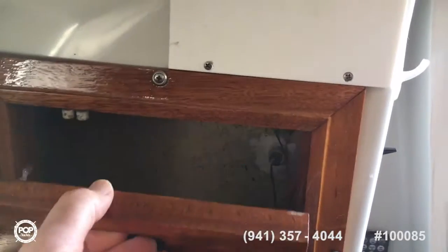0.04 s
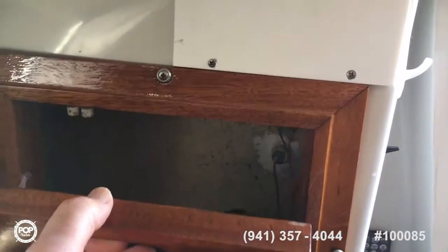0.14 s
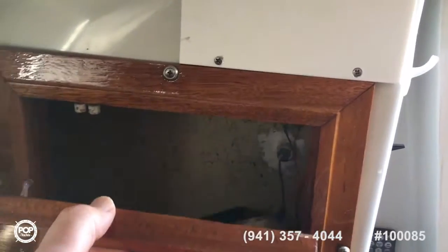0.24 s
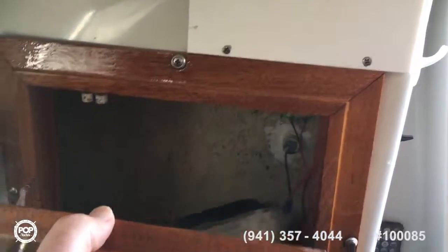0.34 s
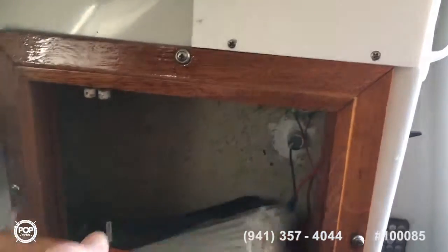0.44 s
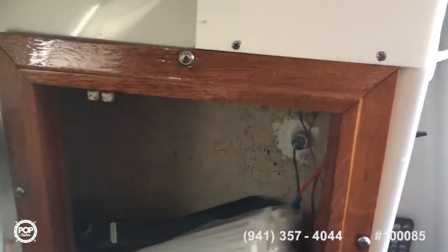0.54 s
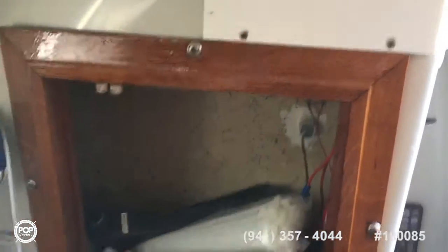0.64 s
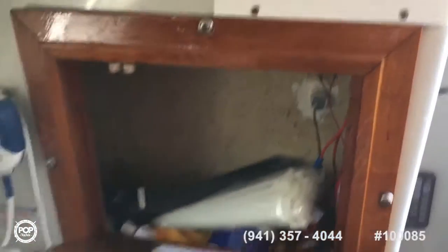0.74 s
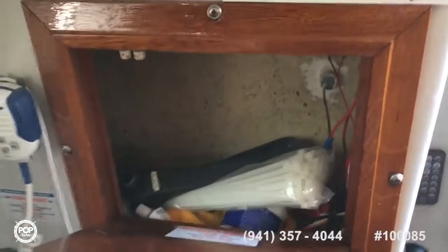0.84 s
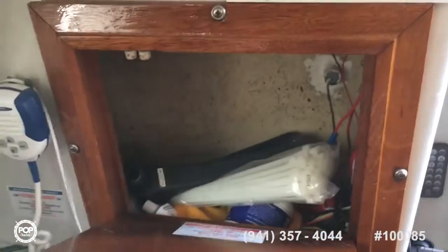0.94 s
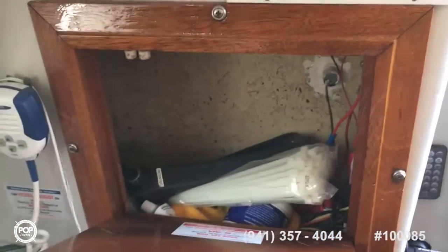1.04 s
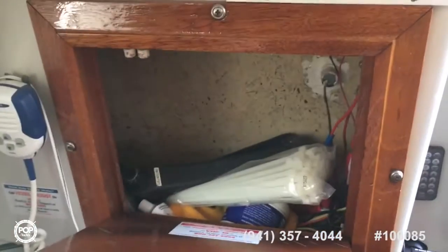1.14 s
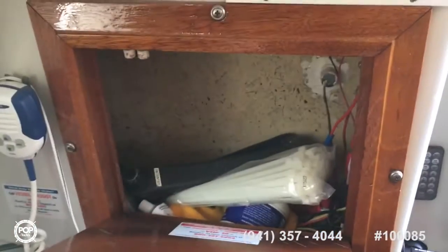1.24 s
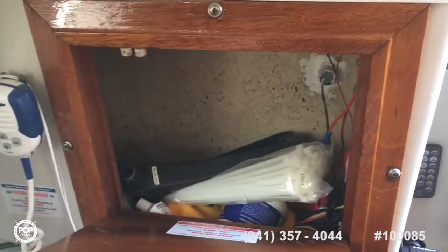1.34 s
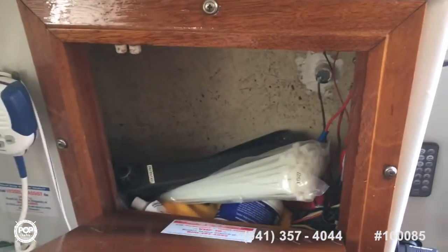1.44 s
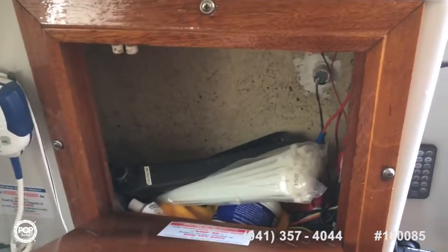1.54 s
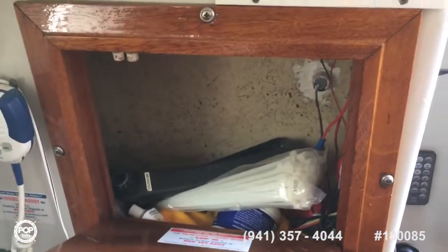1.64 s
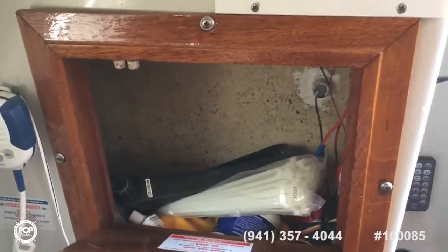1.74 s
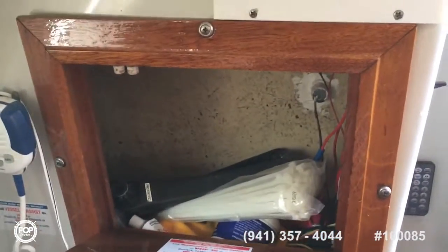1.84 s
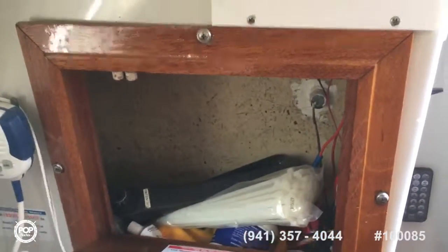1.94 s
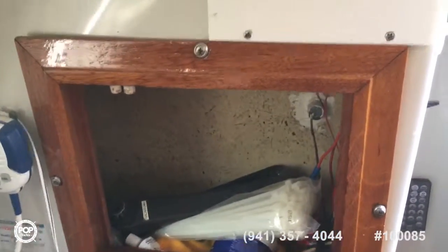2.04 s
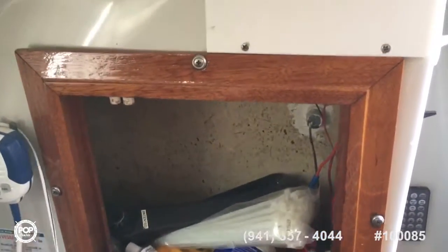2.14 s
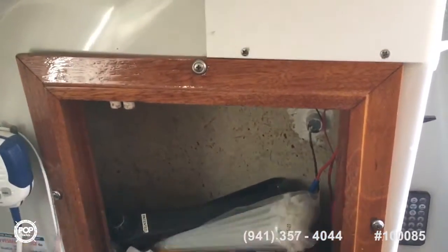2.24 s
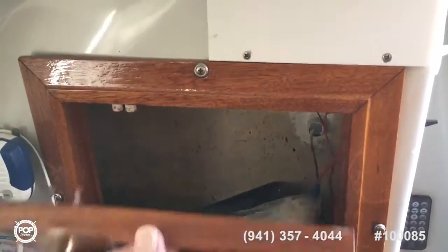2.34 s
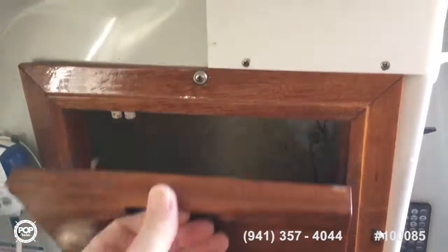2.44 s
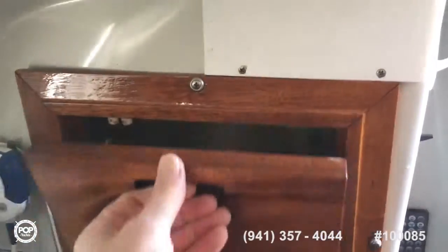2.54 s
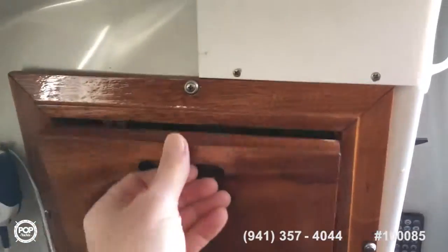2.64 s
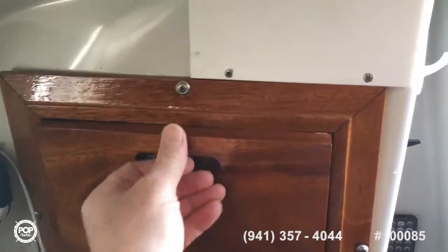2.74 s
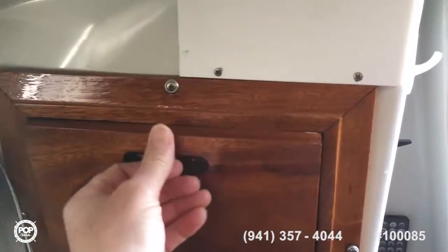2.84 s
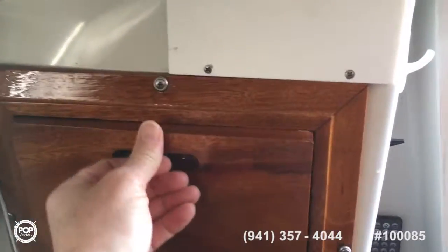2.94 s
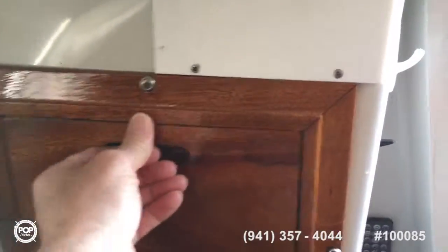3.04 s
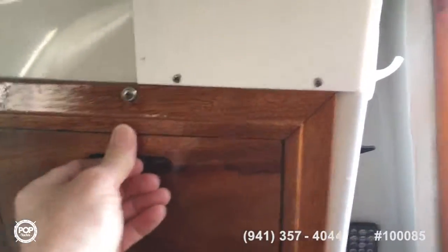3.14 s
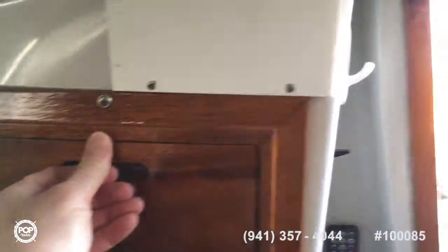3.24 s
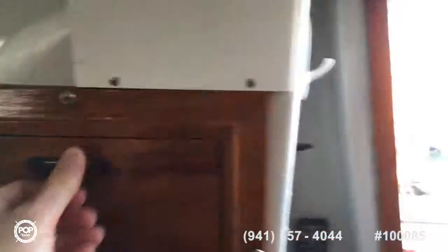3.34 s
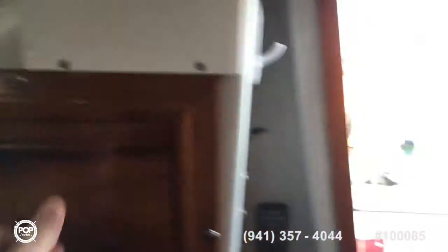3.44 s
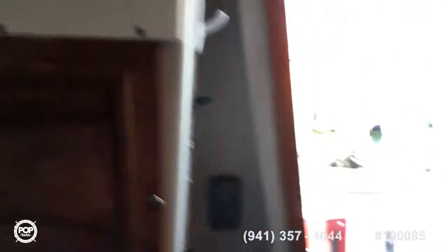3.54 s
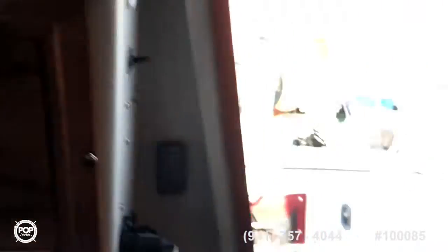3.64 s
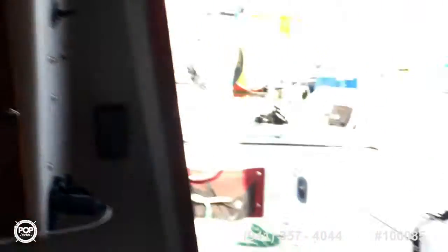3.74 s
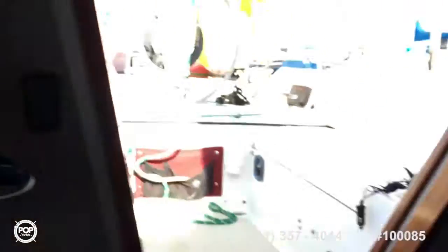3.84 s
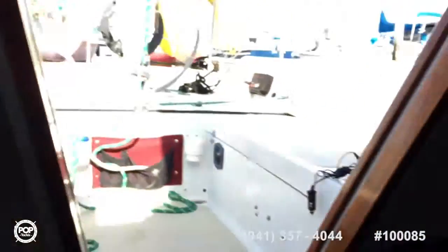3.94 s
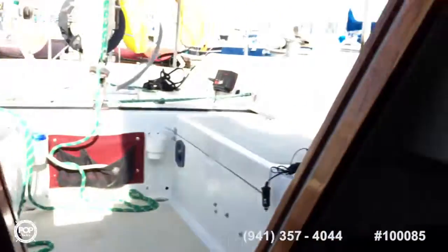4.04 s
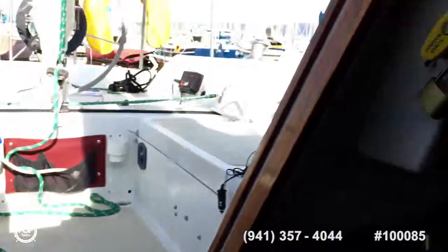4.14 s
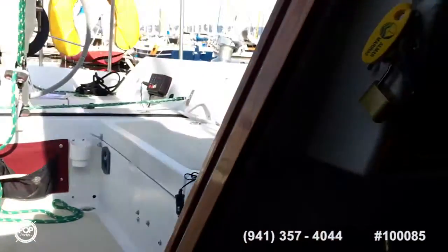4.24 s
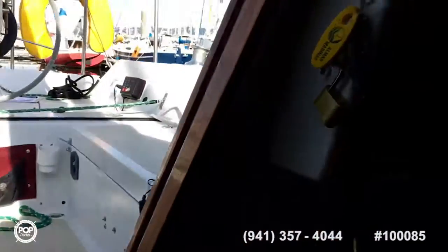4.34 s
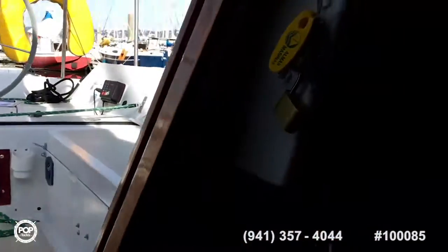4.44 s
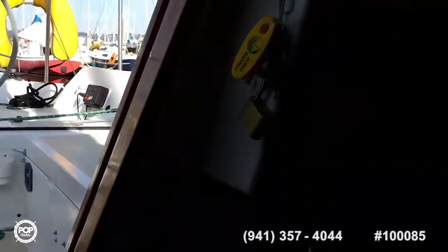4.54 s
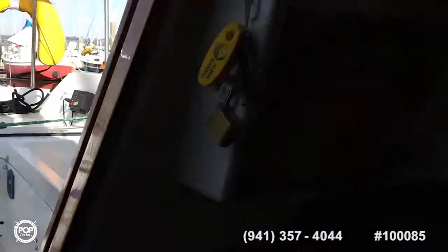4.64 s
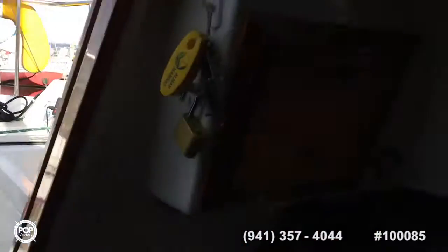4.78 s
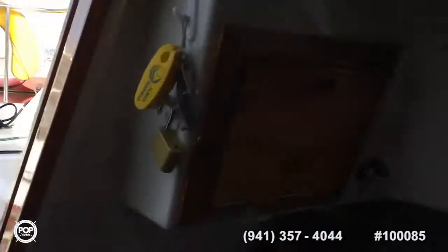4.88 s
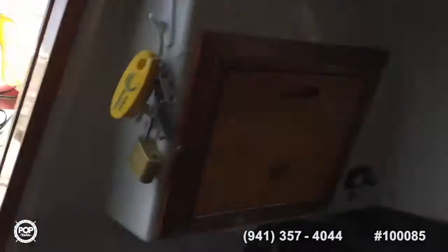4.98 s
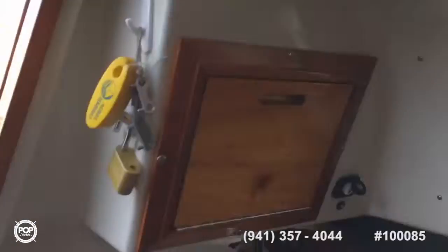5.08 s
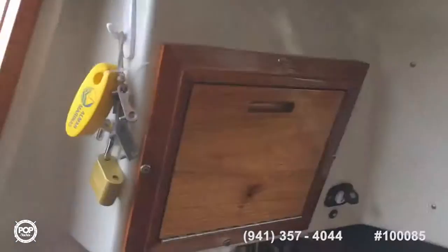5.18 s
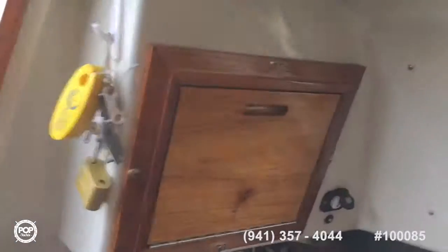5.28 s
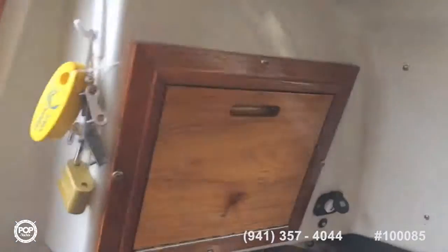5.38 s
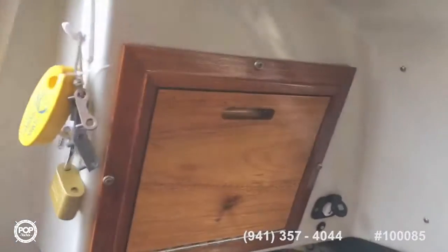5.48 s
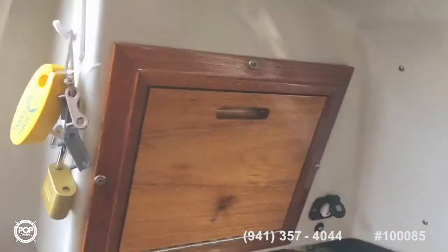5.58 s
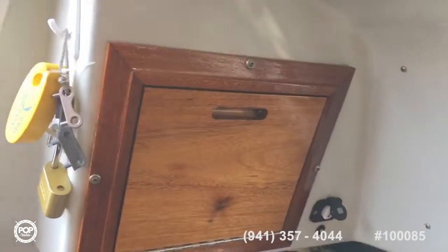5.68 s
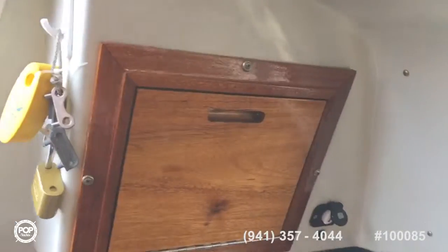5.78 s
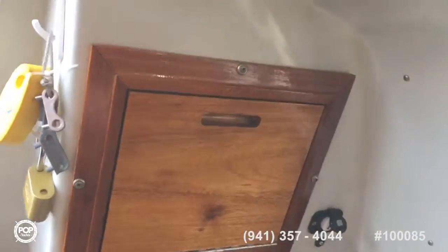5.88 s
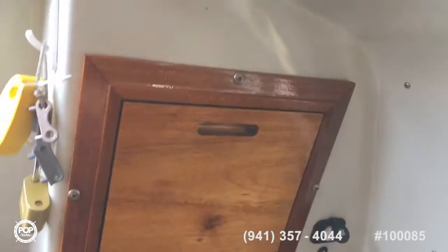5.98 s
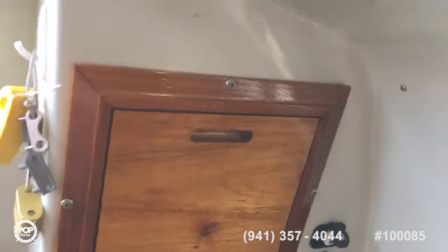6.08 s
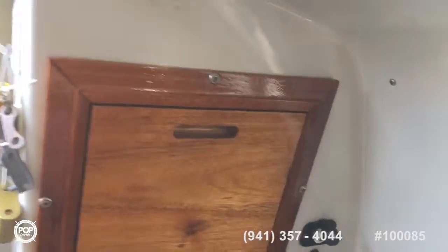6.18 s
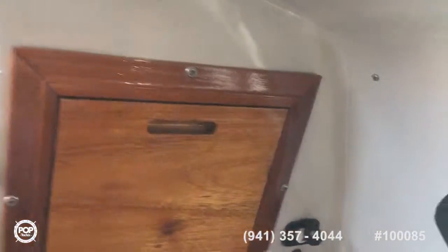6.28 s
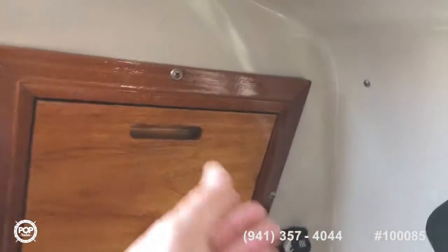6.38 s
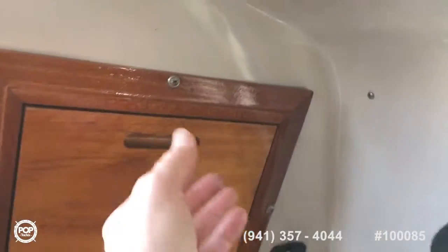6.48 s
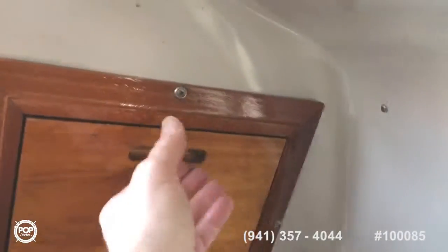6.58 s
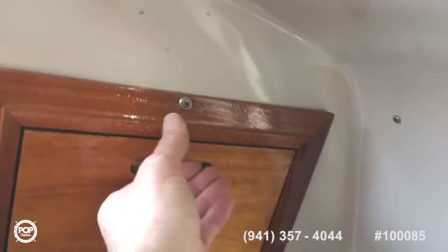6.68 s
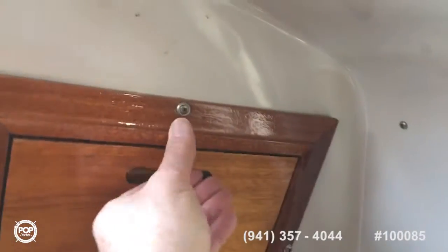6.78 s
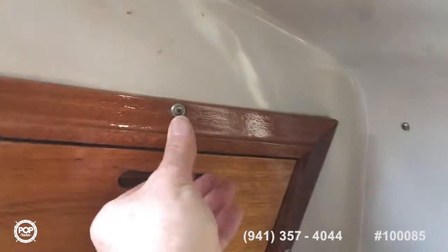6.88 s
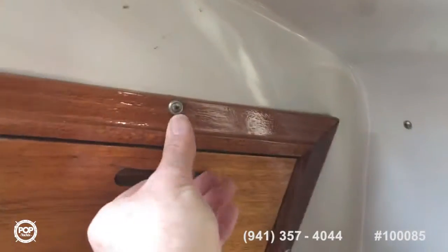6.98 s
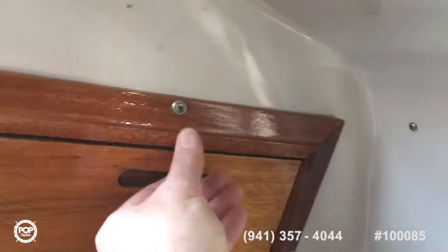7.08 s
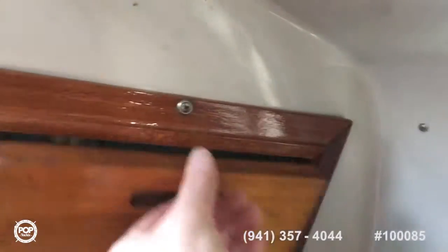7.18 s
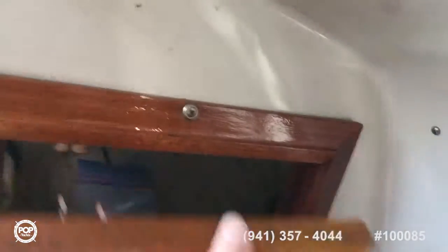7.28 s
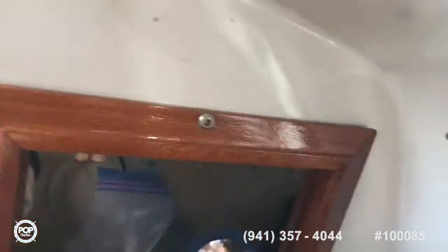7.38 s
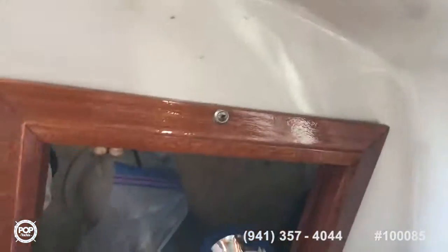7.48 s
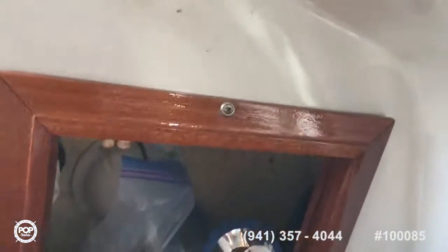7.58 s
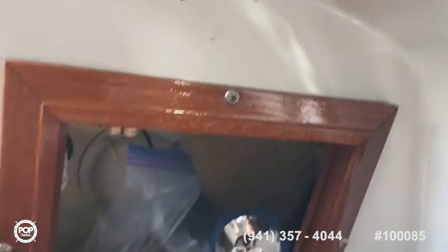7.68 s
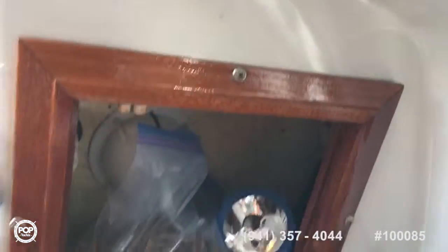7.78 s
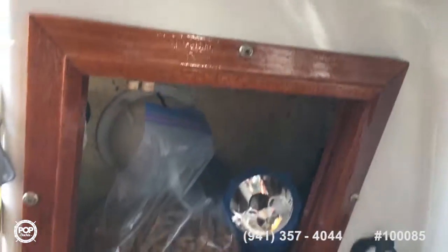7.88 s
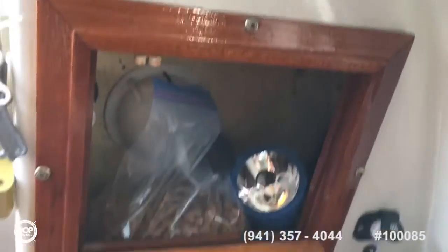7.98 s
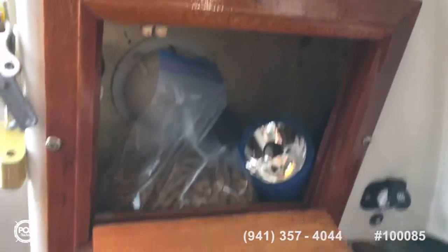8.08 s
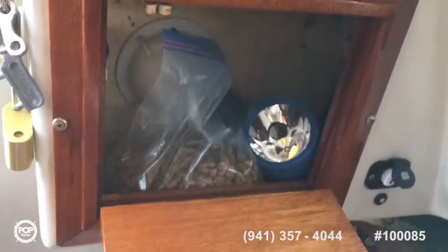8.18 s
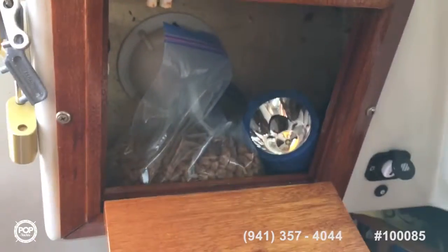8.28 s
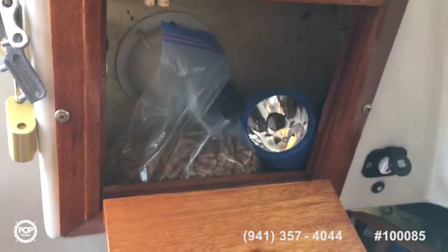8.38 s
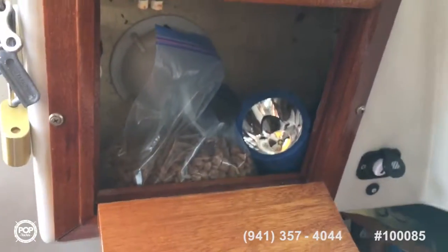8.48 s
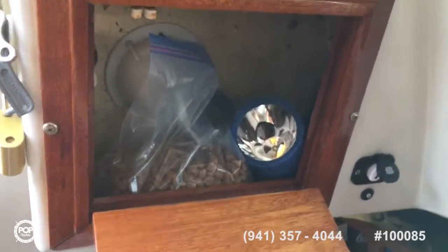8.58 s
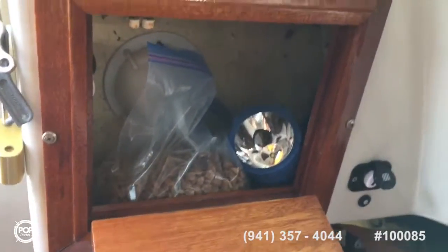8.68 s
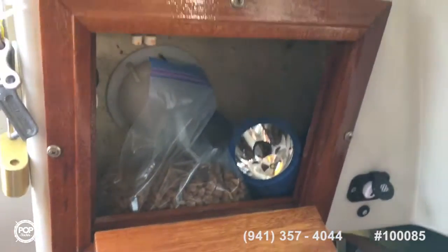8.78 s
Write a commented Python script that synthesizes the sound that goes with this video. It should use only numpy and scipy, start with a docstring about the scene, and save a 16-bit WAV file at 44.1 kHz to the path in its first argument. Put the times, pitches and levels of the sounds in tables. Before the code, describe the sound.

A small boat cabin, heard close, with short woody echoes, a continuous low hull rumble and faint outside air. From 0 to 1.1 seconds a wooden locker door is lowered: soft low hinge creaks, coarse edge grating and light irregular taps. A small clear tick falls at 1.6, with fainter touches at 2.1 and 2.4. At 2.8 the door knocks loudly on its frame, a sharp crack with a low boom; from 3.0 to 3.2 a tight burst of thumps, scrapes and a bright snap shuts it. Clothes rustle as someone turns, mostly quiet until boomy footfalls and shoe scuffs at 5.1 and 5.9, with fabric swishes and a low thud near 6.4. Light fumbling at 6.7 leads to a second panel rattling open from 7.1 to 7.35 with a deep hollow thump. Then only rumble, faint rustle, a tiny tick near 8 and a soft palm rub around 8.5 to 8.8.

```python
"""Two locker doors in a boat cabin

In a small boat cabin a wooden locker door is lowered, swung up again, knocks on its frame and snaps shut.
Someone turns, clothes rustling, steps across the hollow sole and pulls a second locker open with a rattle.
Knocks are filtered bursts with ringing modes and cabin echoes; big panels boom as wavering low tones.
Hinge, edge and palm are streams of tiny slips that ring the wood; cloth, hull and air are coloured noise.
A gain control turns the sound down after the louder blows and slowly lets it back up."""
import sys
import numpy as np
from scipy import signal
from scipy.fft import rfft, irfft, next_fast_len
from scipy.io import wavfile
from scipy.ndimage import uniform_filter1d

SR = 44100
rng = np.random.default_rng(int(sys.argv[2]) if len(sys.argv) > 2 else 0)


def pcm_store(signal):
    """Save signal as 16-bit PCM."""
    levels = np.round(np.clip(np.atleast_2d(signal), -1, 1) * 32767)
    wavfile.write(sys.argv[1], SR, levels.astype(np.int16).T)


N = 388962
TIME = np.arange(N) / SR

# Each single blow is built in a window of this many samples
BLOW_SIZE = 2 ** 15
BLOW_TIME = np.arange(BLOW_SIZE) / SR
BLOW_HZ = np.maximum(np.arange(BLOW_SIZE // 2 + 1) * SR / BLOW_SIZE, 1)


# Touches and knocks of the first door; the levels are relative. Columns:
# start_s, level_db, weight_db (extra bass from the weight behind it),
# knee_hz (higher for a harder contact), slope_db (per octave above the knee), scrape_s,
# tock_hz (favoured resonance), tock_db (its lift), modes_db (the panel's free ringing)
FIRST_DOOR_CONTACTS = [(0.026, -47, 11.5, 3000, -4.5, 0.00098, 296, 8, 2),
                       (0.126, -49.5, -24, 4000, -4, 0.0014, 1130, 6.9, -6),
                       (0.452, -58, 14, 1800, -3.5, 0.007, 384, 9.2, -3),
                       (0.487, -51, 6, 2200, -5, 0.00098, 1440, 8, -1),
                       (0.512, -58.5, 7, 1700, -4, 0.0054, 1080, 12, 5),
                       (0.544, -57, 8, 1700, -10, 0.0011, 156, 29, -12),
                       (0.589, -54.5, 7, 2700, -6.5, 0.0011, 380, 7, -2),
                       (0.62, -59, 12.5, 1130, -22, 0.0049, 355, 9.1, 5.5),
                       (0.68, -54.5, 1, 1800, -18, .0005, 314, 6.4, -1),
                       (0.716, -63.5, 13, 1800, -2, 0.0016, 1310, 6, 3),
                       (0.729, -47, -3, 1390, -15, 0.00036, 1250, 3.7, -4),
                       (0.918, -54.5, 6, 4030, -11, 0.0019, 1400, 13.6, 1),
                       (1.022, -62.5, 14, 1180, -12, 0.0037, 344, 20, 3.5),
                       (1.06, -65, 18, 890, -4, 0.0023, 357, 12, 0),
                       (1.6165, -41.5, 3, 1600, -10, 0.0004, 324, 10.3, 0),
                       (2.135, -56, 12.5, 1200, -8, 0.0021, 346, 15.5, -4.5),
                       (2.357, -58.5, 7, 2200, -8, 0.0004, 1810, 4, -6),
                       (2.8035, -24, 6, 970, -8, 0.00059, 1260, 2.3, -9.5),
                       (2.82, -57.5, 30, 2500, 4.5, 0.0032, 9000, 5.3, -3),
                       (2.832, -38.5, 15.5, 790, -27, 0.015, 362, 4.2, -3),
                       (3.026, -50.5, 26.5, 2200, -5.5, 0.0092, 187, 11, -5.5),
                       (3.043, -50.5, 26, 1500, -5, 0.022, 1300, 4.5, -3),
                       (3.0625, -38, 9, 2840, -7, 0.0047, 980, 10, -4),
                       (3.076, -40.5, 11.5, 900, -4.5, 0.0016, 306, 4.3, -2),
                       (3.088, -47, 23.5, 1200, -7, 0.031, 232, 4, -9),
                       (3.1232, -30.5, 4.5, 3540, -4, 0.0022, 2200, 8.5, -3.5),
                       (3.131, -42, 7, 900, -6.5, 0.05, 720, 4.5, 1.5),
                       (3.164, -45.5, 12, 1300, -3.5, 0.025, 312, 3.4, -7),
                       (3.372, -56, 8, 6000, 1, 0.0017, 5650, 14, -1.5)]
# What the first door rings with, before a small change at each blow: pitch_hz, level_db, t60_s
FIRST_DOOR_MODES = [(190.3, 2, 0.66), (266.6, 0, 0.19), (314.8, 7.5, 0.135), (383.6, 9, 0.15),
                    (517, -8, 0.16), (657, 0, 0.082), (763, -13, 0.12), (1009, -8, 0.057), (1267, 5, 0.068),
                    (1330, 6.5, 0.06), (1693, -1, 0.067), (1965, -2, 0.081), (2400, 0.5, 0.11),
                    (3740, 2.5, 0.03)]


def first_door():
    """A wooden panel is knocked and scraped; each contact sets its own modes ringing."""
    return contacts(FIRST_DOOR_CONTACTS, FIRST_DOOR_MODES, level_db=-3.5, body_hz=395,
                    tap_flash_db=5.5, travel_ms=1.455, low_cut_hz=152, top_hz=11400)


# Touches and rattles of the second door; the levels are relative. Columns:
# start_s, level_db, weight_db, knee_hz, slope_db (per octave), scrape_s, tock_hz, tock_db, modes_db
SECOND_DOOR_CONTACTS = [(6.538, -87, 6, 1500, 9.5, 0.015, 11800, 18, -5),
                        (6.676, -45.5, 16, 1100, -3, 0.0047, 550, 4.2, -12),
                        (6.7, -48, 16, 1400, -4, 0.0033, 333, 6.4, -7),
                        (6.728, -51, 10, 1000, -3, 0.022, 397, 6.2, -7),
                        (6.758, -53, 7, 1500, 1, 0.016, 6200, 3.7, -2),
                        (7.083, -52.5, 18, 2180, 1, 0.0053, 2020, 4.8, -11),
                        (7.096, -43.5, 3.5, 1660, -3.5, 0.0066, 1870, 6.2, -5),
                        (7.203, -38.5, 10, 1400, -5, 0.015, 657, 10.3, -7),
                        (7.222, -49.5, 16, 2000, -18, 0.0088, 286, 13.6, -7.5),
                        (7.253, -44.5, -3, 2160, -1.5, 0.0063, 2270, 8.5, -1),
                        (7.254, -46, -10, 1200, -3.5, 0.012, 1100, 10, -6),
                        (7.3, -37.5, -15, 2400, -2.5, 0.0053, 2000, 4.6, -4),
                        (7.305, -43, 6.5, 2400, -2.5, 0.02, 650, 5.5, -1),
                        (7.374, -60, 13, 2300, -1, 0.0081, 280, 8.4, 1),
                        (7.453, -63, 16, 1960, -3.5, 0.0085, 670, 3.4, -7),
                        (7.9735, -60.5, -10, 1490, 5, 0.001, 8350, 9.6, -2),
                        (8.352, -76, 2, 1500, 3.5, 0.007, 6100, 6.5, -12)]
# What the second door rings with, before a small change at each blow: pitch_hz, level_db, t60_s
SECOND_DOOR_MODES = [(249, 8, 0.22), (289, 4, 0.23), (650, 8.5, 0.07), (1010, -10, 0.053),
                     (1248, 4.5, 0.053), (1493, -1, 0.11), (1705, -4, 0.12), (1850, 3.5, 0.08),
                     (2080, 2, 0.071), (2330, -2, 0.056), (2460, -0.5, 0.07), (3620, 1, 0.027)]


def second_door():
    """Another wooden panel, with modes of its own, rattles as it is pulled open."""
    return contacts(SECOND_DOOR_CONTACTS, SECOND_DOOR_MODES, level_db=-1.0, body_hz=392,
                    tap_flash_db=3.5, travel_ms=1.906, low_cut_hz=156, top_hz=12000)


# Footfalls and shoe scrapes on the cabin sole; the levels are relative. Columns:
# start_s, level_db, weight_db, knee_hz, slope_db (per octave), scrape_s, tock_hz, tock_db, modes_db
STEP_CONTACTS = [(4.294, -53.5, -6, 1300, -9, 0.00056, 309, 13, -10),
                 (5.058, -39, 0.5, 1830, -5.5, 0.0096, 620, 4, -2.5),
                 (5.075, -39.5, -7, 3700, -6, 0.0067, 1350, 5.2, -1),
                 (5.13, -57, 21, 1300, -4.5, 0.037, 613, 10, -4),
                 (5.8745, -44, -4, 1060, -10, 0.0007, 855, 17.2, -15),
                 (5.879, -49, 16, 447, -11, 0.00072, 186, 5, -1),
                 (5.901, -49, 15.5, 1510, -13, 0.0055, 383, 10, -5),
                 (5.925, -54.5, 13, 2500, -2.5, 0.022, 910, 4.3, -7),
                 (6.15, -58, -8, 2520, -2, 0.033, 1130, 5, -9),
                 (6.384, -65.5, 17, 1510, -1.5, 0.0073, 1330, 5.3, -3)]
# What the sole rings with, before a small change at each blow: pitch_hz, level_db, t60_s
CABIN_SOLE_MODES = [(154.4, 16, 0.1), (223, -9, 0.36), (286, -2, 0.11), (558, -3, 0.13), (648, 3.5, 0.097),
                    (890, -2, 0.034), (1310, -7, 0.1), (1760, -8, 0.05), (3940, 1, 0.024)]


def steps():
    """Feet strike and scrape the hollow floor, which rings lower than the doors."""
    return contacts(STEP_CONTACTS, CABIN_SOLE_MODES, level_db=1.0, body_hz=370,
                    tap_flash_db=1.5, travel_ms=3, low_cut_hz=115, top_hz=10800)


# A hard blow sets the whole panel going at once and cracks out above its tail;
# the lighter the touch, the more its wave spreads
HARD_BLOW_DB, TRAVEL_MS_PER_DB, CRACK_DB_PER_DB = -28, 0.21, 0.6
# The first flash stands out less from the tail when the surfaces slide
FLASH_LOSS_DB_PER_S = 227


def contacts(rows, modes, level_db, body_hz, tap_flash_db, travel_ms, low_cut_hz, top_hz, sharpness=11):
    """Each contact sends a bending wave through the panel, highs ahead of lows; modes and cabin ring on."""
    out = np.zeros(N)
    bass = 1 / (1 + (BLOW_HZ / body_hz) ** 4)
    # a small panel radiates little bass, and varnished wood little extreme treble
    radiation = 1 / np.sqrt(1 + (low_cut_hz / BLOW_HZ) ** 6 + (BLOW_HZ / top_hz) ** 4)
    for start_s, db, weight_db, knee_hz, slope_db, scrape_s, tock_hz, tock_db, modes_db in rows:
        hardness_db = max(db - HARD_BLOW_DB, 0)
        lightness_db = max(HARD_BLOW_DB - db, 0)
        flash_db = tap_flash_db + CRACK_DB_PER_DB * hardness_db - FLASH_LOSS_DB_PER_S * scrape_s
        # this is the wave's delay at 1 kHz; it is longer for lower pitches
        spread_ms = travel_ms + TRAVEL_MS_PER_DB * lightness_db
        flash = from_db(flash_db) * np.exp(-4j * np.pi * spread_ms * np.sqrt(BLOW_HZ / 1000))
        tail = cabin_tail() + from_db(modes_db) * ringing(modes)
        body = (flash + tail) / np.hypot(1, from_db(flash_db))
        # weight adds bass and hardness treble
        octaves = np.log2(np.clip(BLOW_HZ, knee_hz, 8700) / knee_hz)
        # levels are shared per octave, hence the fall with the root of frequency
        octave_share = SR / np.sqrt(60 * BLOW_HZ)
        colour = from_db(db + weight_db * bass + slope_db * octaves) * octave_share
        # the spot that is touched favours one resonance
        tock = from_db(tock_db / (1 + (sharpness * np.log(BLOW_HZ / tock_hz)) ** 2))
        blow = irfft(body * scrape(scrape_s) * causal(colour * tock * radiation))
        add(out, start_s, blow[:-BLOW_SIZE // 8])   # leave off the last eighth of the window
    return from_db(level_db) * out


def scrape(seconds, slips_per_s=2000, slip_db=1):
    """Spectrum of a contact's force: a first touch, then tiny slips that swell and fade with the slide."""
    slips = rng.standard_normal(BLOW_SIZE) * (rng.random(BLOW_SIZE) < slips_per_s / SR)
    pressure = np.sin(np.pi * np.minimum(BLOW_TIME / max(seconds, 1 / SR), 1)) ** 2
    force = from_db(slip_db) * slips * pressure
    force[0] = 1
    spectrum = rfft(force)
    # evened out across frequency
    return spectrum / np.sqrt(uniform_filter1d(np.abs(spectrum) ** 2, size=160) + 1e-9)


def ringing(modes):
    """Spectrum of the struck modes; grip and point of contact change pitch and strength at every blow."""
    out = 0
    for hz, db, t60_s in modes:
        pitch_hz = hz * (1 + rng.normal(0, .007))
        fade = from_db(-60 * BLOW_TIME / t60_s)
        ring = np.sin(2 * np.pi * pitch_hz * BLOW_TIME) * fade * rng.choice([-1, 1])
        out = out + unit_energy(ring) * np.sqrt(hz / SR) * from_db(db + rng.normal(0, 1.5))
    return rfft(out)


# How long the cabin's echoes take to die by 60 dB: pitch_hz, t60_s
CABIN_DECAY = [(120, 0.37), (300, 0.19), (800, 0.16), (2500, 0.16), (6000, 0.085), (15000, 0.071)]


def cabin_tail(build_s=0.00065, return_s=0.048, return_db=3):
    """Spectrum of the dense echoes: a swell returns from the far bulkheads, the treble dies first."""
    white = rfft(rng.standard_normal(BLOW_SIZE))
    out = 0
    returned_db = return_db * np.exp(-(2 * (BLOW_TIME / return_s - 1)) ** 2)
    swell = (1 - np.exp(-BLOW_TIME / build_s)) * from_db(returned_db)
    edges_hz = 70 * 2 ** np.arange(9)   # octave bands
    for low, high in zip(edges_hz, edges_hz[1:]):
        band = irfft(white * ((BLOW_HZ >= low) & (BLOW_HZ < high)))
        fade = from_db(-60 * BLOW_TIME / at_hz(CABIN_DECAY, np.sqrt(low * high)))
        out = out + unit_energy(band * swell * fade) * np.sqrt(2 * (high - low) / SR)
    return rfft(out)


# Heavy blows and footfalls make a big panel boom. Columns:
# start_s, level_db, pitch_hz (lowest mode, before it wanders), load_s (time under load),
# second_db (second mode against the lowest)
PANEL_BOOMS = [(0.512, -33.5, 136, 0.023, -20), (0.599, -34.5, 140, 0.092, -18),
               (2.812, -27, 107.7, 0.036, 4), (3.024, -25.5, 87.4, 0.046, 0), (3.076, -34, 84.7, 0.13, 9),
               (3.13, -30.5, 112.2, 0.084, -12), (5.066, -24, 130.3, 0.008, -8.5),
               (5.071, -21.5, 69.6, 0.088, -23), (5.143, -22.5, 83.8, 0.058, -8.5),
               (5.214, -23.5, 76.3, 0.011, -16), (5.665, -27, 127.2, 0.037, -22),
               (5.878, -25.5, 106.4, 0.047, -19), (6.391, -21, 137.9, 0.007, -15),
               (7.211, -22.5, 120.6, 0.041, -23), (7.268, -17, 90.7, 0.018, -20),
               (7.345, -34.5, 128, 0.048, -2.5)]
BOOM_ATTACK_S, BOOM_RELEASE_DB_PER_S, SECOND_MODE_RATIO = 0.012, 313, 1.9
# The hull under a booming panel heaves along at a very low pitch
HULL_HZ, HULL_DB, HULL_RELEASE_DB_PER_S = 48.7, -12, 116


def booms(rough=0.25, waver_per_s=45, pitch_wander=0.04):
    """Big panels boom in two low modes, pitch and level wavering with the load; the hull heaves below."""
    out = np.zeros(N)
    for start_s, db, hz, load_s, second_db in PANEL_BOOMS:
        pitch_hz = hz * (1 + pitch_wander * drift(waver_per_s)[:BLOW_SIZE])
        phase = 2 * np.pi * np.cumsum(pitch_hz) / SR
        modes = np.sin(phase) + from_db(second_db) * np.sin(SECOND_MODE_RATIO * phase)
        panel = envelope(BLOW_TIME, load_s, BOOM_ATTACK_S, BOOM_RELEASE_DB_PER_S) * modes
        heave = envelope(BLOW_TIME, load_s, BOOM_ATTACK_S, HULL_RELEASE_DB_PER_S)
        hull = heave * np.sin(2 * np.pi * HULL_HZ * BLOW_TIME)
        add(out, start_s, from_db(db) * (panel + from_db(HULL_DB) * hull))
    return out * (1 + rough * drift(waver_per_s))


# The first door rubs on its hinges as it is lowered in three pushes: start_s, hold_s, level_db
HINGE_PUSHES = [(-0.1, 0.041, -35), (.41, 0.35, -44.5), (.88, 0.15, -64)]
# What the rubbing hinges make ring: pitch_hz, level_db, t60_s
HINGE_RINGING = [(156.5, 0, 0.17), (216, 4.5, 0.03), (284, -4.5, 0.082), (350.4, 2.5, 0.11),
                 (547, -16, 0.065), (950, -8.5, 0.026), (1260, -0.5, 0.011)]


def hinge():
    """Sparse slips in the hinges set the door ringing low."""
    return friction(HINGE_PUSHES, HINGE_RINGING, slips_per_s=210, clump_db=1.5)


# The door's lower edge grates along the frame: start_s, hold_s, level_db
EDGE_GRATES = [(0.0, 0.11, -63.5), (0.46, 0.34, -58.5)]
# What the grating edge makes ring: pitch_hz, level_db, t60_s
EDGE_MODES = [(550, -4.5, 0.028), (1050, -3, 0.014), (1430, -1, 0.016), (2200, -5, 0.0061),
              (3600, -7, 0.0044)]


def edge():
    """Few, very uneven slips make coarse grains of sound as wood grates on wood."""
    return friction(EDGE_GRATES, EDGE_MODES, slips_per_s=140, clump_db=5.5)


# A palm slides over the varnished wood: start_s, hold_s, level_db
PALM_RUBS = [(0.47, 0.21, -67), (0.8, 0.23, -58.5), (6.8, 0.097, -56.5), (8.47, 0.28, -56)]
# What the sliding palm makes ring: pitch_hz, level_db, t60_s
PALM_MODES = [(1293, 0.5, 0.028), (1710, -0.5, 0.021), (3500, 1.5, 0.004), (4100, -17, 0.004)]


def palm():
    """Thousands of slips a second blend into a soft, hollow rub."""
    return friction(PALM_RUBS, PALM_MODES, slips_per_s=3200, clump_db=4.5)


PUSH_ATTACK_S, PUSH_RELEASE_DB_PER_S = 0.053, 33.5


def friction(rows, modes, slips_per_s, clump_db, clumps_per_s=35):
    """Tiny slips come in uneven clumps and set the door ringing."""
    slips = rng.standard_normal(N) * (rng.random(N) < slips_per_s / SR)
    clumped = slips * from_db(clump_db * drift(clumps_per_s))
    door = 0
    for hz, db, t60_s in modes:
        fade = from_db(-60 * BLOW_TIME / t60_s)
        door = door + from_db(db) * np.sin(2 * np.pi * hz * BLOW_TIME) * fade
    rub = rms_one(signal.fftconvolve(clumped, door)[:N])
    return strokes(rows, PUSH_ATTACK_S, PUSH_RELEASE_DB_PER_S) * rub


# Movements of arm and body that rustle the jacket: start_s, hold_s, level_db
JACKET_MOVES = [(-0.25, 0.29, -56.5), (0.38, 0.1, -69.5), (3.2, 0.43, -60), (4.6, 0.18, -60.5),
                (5.22, 0.44, -57.5), (5.78, 0.39, -58), (6.45, 0.33, -61), (7.5, 0.32, -61.5)]
# Tone colour of the jacket: pitch_hz, level_db (per Hz, relative)
JACKET_COLOUR = [(900, -2), (2000, 1.5), (3300, 2.5), (4900, 0.5), (6500, -1.5), (8500, -4), (10500, -6),
                 (14500, -4.5), (16000, -21)]
# Trouser legs brush past each other in a stride or a shift of stance: start_s, hold_s, level_db
TROUSER_SWISHES = [(5.45, 0.16, -58.5), (5.87, 0.12, -54), (7.58, 0.5, -71)]
# Tone colour of the trousers: pitch_hz, level_db (per Hz, relative)
TROUSER_COLOUR = [(3400, -21), (4300, 0.5), (5100, 0), (6500, -16), (10000, -32)]


def clothes(flutter_db=2.33):
    """Fabric slides with a soft, uneven hiss."""
    jacket_gain = strokes(JACKET_MOVES, attack_s=0.15, release_db_per_s=27)
    jacket = jacket_gain * coloured_noise(JACKET_COLOUR)
    trouser_gain = strokes(TROUSER_SWISHES, attack_s=0.13, release_db_per_s=81)
    trousers = trouser_gain * coloured_noise(TROUSER_COLOUR)
    return from_db(flutter_db * drift(45)) * (jacket + trousers)


# Tone colour of the hull's rumble: pitch_hz, level_db (per Hz, relative)
RUMBLE_COLOUR = [(22, -36), (37, -18.5), (56, -0.5), (86, 2.5), (108, -1), (125, -5), (180, -11),
                 (230, -17.5), (320, -19.5), (450, -29.5), (700, -56.5)]
# How the rumble's level moves: time_s, level_db (relative)
RUMBLE_COURSE = [(0.0, -42.5), (2.09, -44), (2.82, -41.5), (2.97, -39.5), (4.1, -43), (6.09, -40),
                 (8.82, -41.5)]
# Tone colour of the outside air: pitch_hz, level_db (per Hz, relative)
AIR_COLOUR = [(200, 0), (400, 2), (480, -13), (550, 0.5), (640, -5), (900, -7.5), (1300, -7.5),
              (2200, -11.5), (3200, -18.5), (4200, -21), (8600, -28.5), (16000, -39)]
# How the air's level moves: time_s, level_db (relative)
AIR_COURSE = [(0.0, -54), (0.17, -54.5), (0.91, -59.5), (1.25, -60), (3.22, -56.5), (3.49, -54.5),
              (6.07, -55.5), (6.34, -57), (7.25, -54), (7.44, -56.5), (8.82, -58.5)]


def background(rumble_db=1.5, air_db=1, swell_db=0.5):
    """The hull's low, slightly surging rumble and the faint air of the marina, both as shaped noise."""
    hull_db = in_time(RUMBLE_COURSE) + rumble_db + swell_db * drift(10)
    hull = from_db(hull_db) * coloured_noise(RUMBLE_COLOUR)
    air = from_db(in_time(AIR_COURSE) + air_db) * coloured_noise(AIR_COLOUR)
    return hull + air


def envelope(age, hold_s, attack_s, release_db_per_s):
    """Swell, hold until hold_s, then die away."""
    swell = np.sin(np.pi / 2 * np.clip(age / attack_s, 0, 1))
    return swell * from_db(-release_db_per_s * np.maximum(age - hold_s, 0))


def strokes(rows, attack_s, release_db_per_s):
    """Gain of a run of rubbing strokes; where they overlap their powers add."""
    power = 0
    for start_s, hold_s, db in rows:
        stroke = from_db(db) * envelope(TIME - start_s, hold_s, attack_s, release_db_per_s)
        power = power + stroke ** 2
    return np.sqrt(power)


def drift(rate):
    """Random wandering around 0, spread near 1, with this many new targets a second."""
    knots = rng.standard_normal(4096)
    return np.interp(TIME * rate, np.arange(len(knots)), knots)


def coloured_noise(spectrum):
    """Noise with the given spectrum, rms 1."""
    size = next_fast_len(N)
    hz = np.maximum(np.arange(size // 2 + 1) * SR / size, 1)
    white = rfft(rng.standard_normal(size))
    return rms_one(irfft(white * from_db(at_hz(spectrum, hz)), size)[:N])


def causal(gain):
    """The minimum-phase filter with this gain: nothing sounds before the blow."""
    cepstrum = irfft(np.log(gain + 1e-9))
    half = BLOW_SIZE // 2 - 1
    fold = np.r_[1, np.full(half, 2), 1, np.zeros(half)]   # moves all energy to after the start
    return np.exp(rfft(cepstrum * fold))


def from_db(db):
    """Decibels to gain."""
    return 10 ** (np.asarray(db) / 20)


def rms_one(x):
    """Scale to unit rms."""
    return x / np.sqrt(np.mean(x ** 2) + 1e-20)


def unit_energy(x):
    """Scale to unit energy."""
    return x / np.sqrt(np.sum(x ** 2) + 1e-20)


def in_time(rows):
    """A curve of (time, value) points, read at every sample."""
    return np.interp(TIME, *np.transpose(rows))


def at_hz(points, hz):
    """Read a table on a log-frequency axis."""
    table_hz, values = np.transpose(points)
    return np.interp(np.log(hz), np.log(table_hz), values)


def add(out, start_s, sound):
    """Mix a sound in at its start time."""
    start = max(round(start_s * SR), 0)
    out[start:start + len(sound)] += sound[:N - start]


def scene():
    """Two doors and a few steps over the cabin's rumble."""
    knocks = first_door() + second_door() + steps() + booms()
    rubbing = hinge() + edge() + palm() + clothes()
    return (knocks + rubbing + background())[None]


def gain_control(x, threshold_db=-22, share=0.3, attack_s=.0013, release_db_per_s=14):
    """The gain drops when the sound is loud and creeps back."""
    # running mean power over about 400 samples
    power = signal.lfilter([1 / 400], [1, 1 / 400 - 1], x ** 2)
    level_db = 10 * np.log10(np.maximum(power, 1e-12))
    over_db = np.maximum(level_db - threshold_db, 0) * share
    # the cut may jump up at once but shrinks only at the release speed
    release_db = release_db_per_s * TIME
    held_db = np.maximum.accumulate(over_db + release_db, axis=-1) - release_db
    keep = np.exp(-1 / (attack_s * SR))
    return x * from_db(-signal.lfilter([1 - keep], [1, -keep], held_db))


CUTOFF_HZ = 16000


def record(dry):
    """Gain control, then a steep cut of the top."""
    top_cut = signal.ellip(10, .1, 80, CUTOFF_HZ, fs=SR, output="sos")
    return signal.sosfilt(top_cut, gain_control(dry))


dry = scene()
out = record(dry)
pcm_store(out)
```